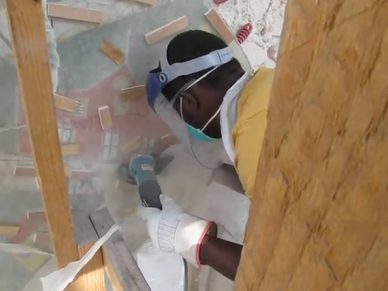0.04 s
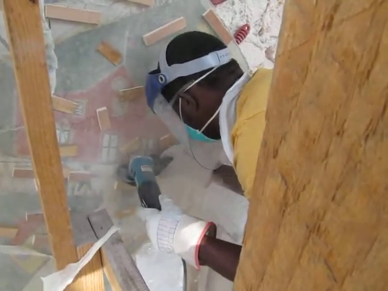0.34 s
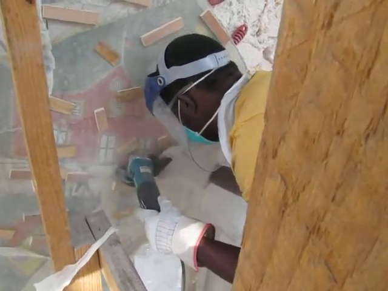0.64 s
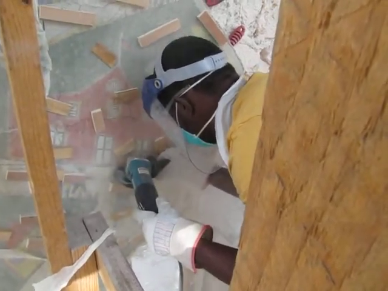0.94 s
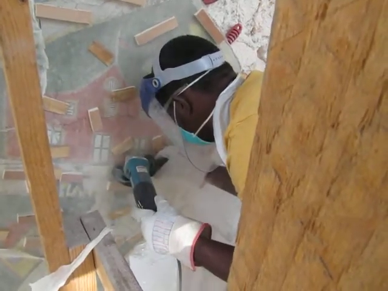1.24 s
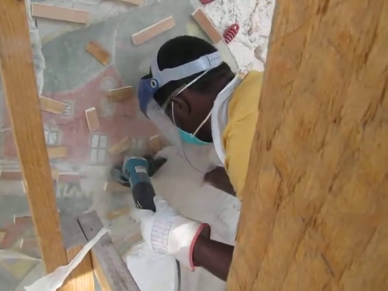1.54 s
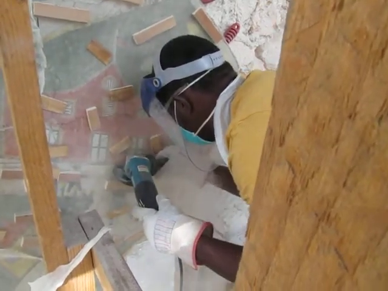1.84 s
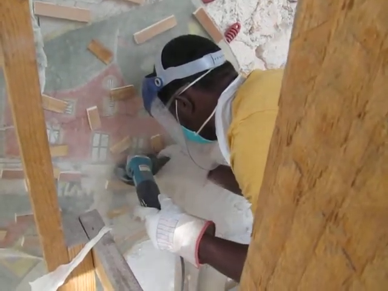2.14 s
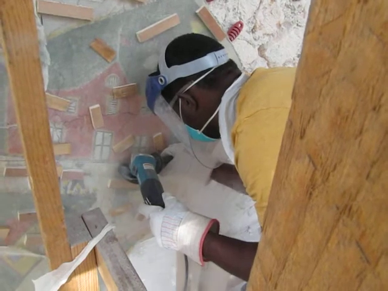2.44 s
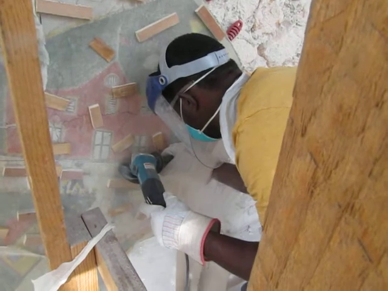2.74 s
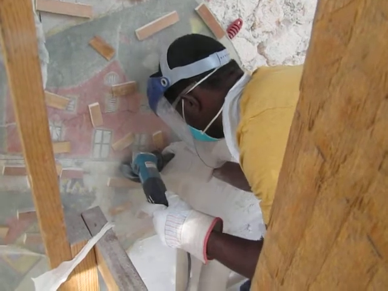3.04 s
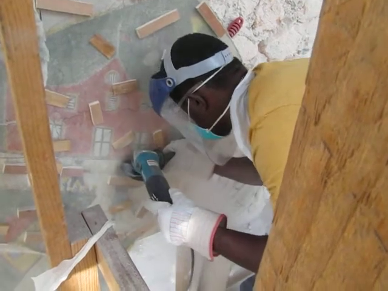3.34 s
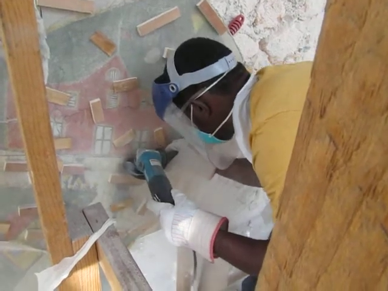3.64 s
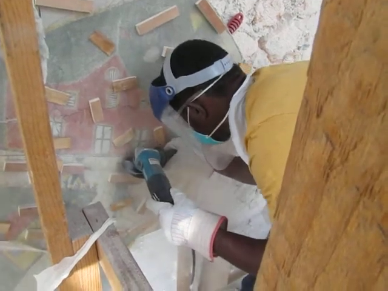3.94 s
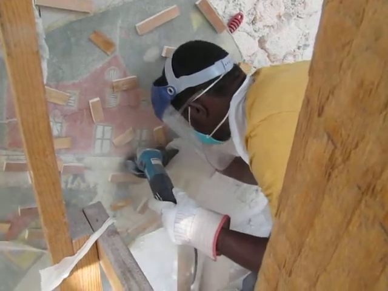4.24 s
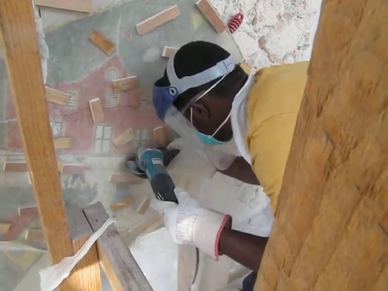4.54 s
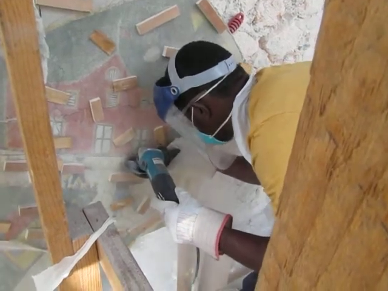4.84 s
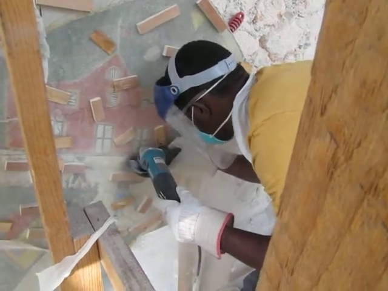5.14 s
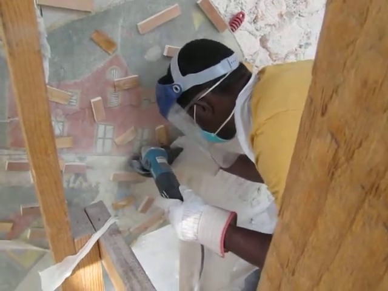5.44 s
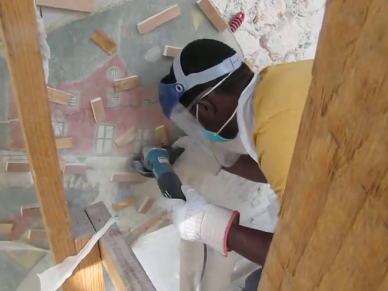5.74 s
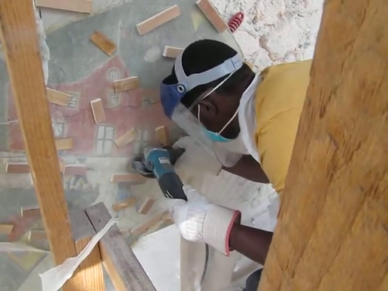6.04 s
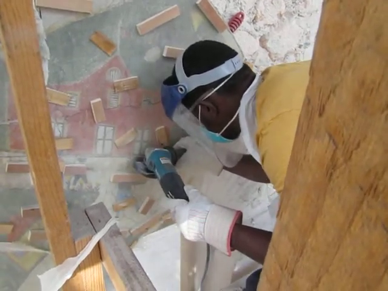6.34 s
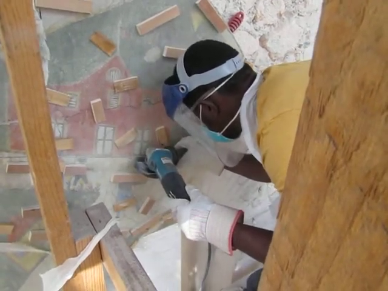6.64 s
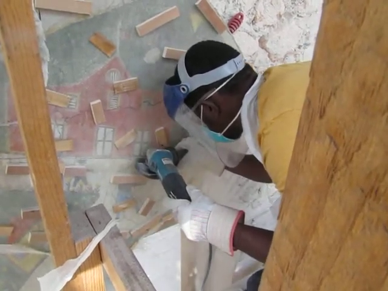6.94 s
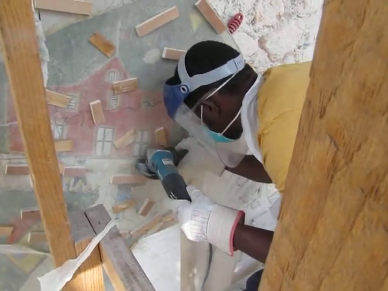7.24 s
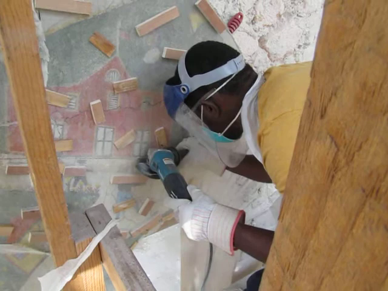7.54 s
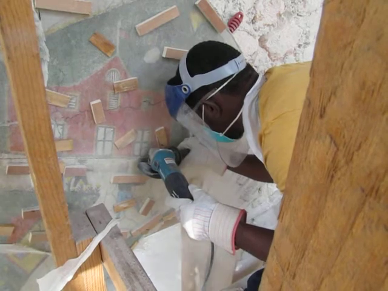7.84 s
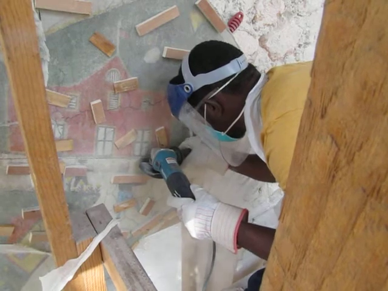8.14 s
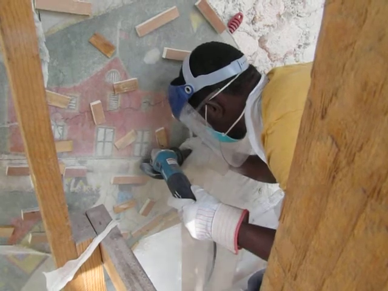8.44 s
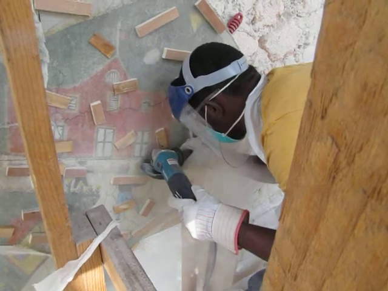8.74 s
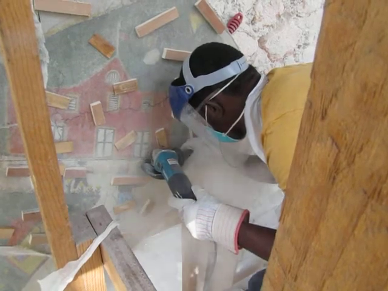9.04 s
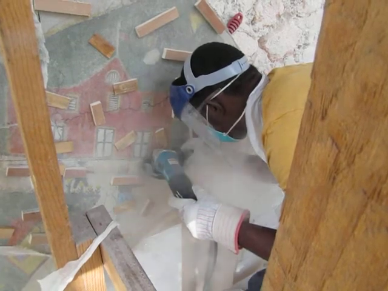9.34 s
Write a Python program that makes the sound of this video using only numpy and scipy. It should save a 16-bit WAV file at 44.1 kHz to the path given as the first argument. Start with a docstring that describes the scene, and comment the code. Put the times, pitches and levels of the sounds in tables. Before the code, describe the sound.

A handheld grinder whines and rasps without pause as its ringing disc bites into stone, chattering and faintly squealing.

```python
"""A harsh scrape, a steely ring and a high whine: an angle grinder cuts a groove in a plastered brick
or stone wall, about a metre away. Grit scrapes the rim and rings the steel disc, while the gear teeth
whine and rattle in their housing. The motor slows as the hand presses, and the disc chatters and now
and then squeals as it sinks in. A low rumble and air from the vents lie underneath, two dull bumps
pass, and the bare room adds a short echo."""
import sys
import numpy as np
from scipy import signal
from scipy.fft import rfft, irfft, next_fast_len
from scipy.io import wavfile
from scipy.ndimage import uniform_filter1d, minimum_filter1d, map_coordinates

SR = 44100
rng = np.random.default_rng(int(sys.argv[2]) if len(sys.argv) > 2 else 0)


def master(y):
    """Save y as 16-bit WAV."""
    cut = np.clip(np.atleast_2d(y).T, -1, 1)
    pcm = np.round(cut * 32767)  # scale
    wavfile.write(sys.argv[1], SR, pcm.astype(np.int16))


N = 414099
TIME = np.arange(N) / SR
FFT_SIZE = next_fast_len(N + SR, True)
FREQS_HZ = np.fft.rfftfreq(FFT_SIZE, 1 / SR) + 1e-3

# The motor's turns a second, which sag as the hand presses: time_s, speed_hz
MOTOR_SPEED = [(0, 455.4), (.3, 450.5), (.72, 450.8), (1.08, 444.7), (1.48, 431.2), (1.86, 435.5),
               (2.25, 435.6), (2.65, 453.2), (3.5, 453), (4.34, 444.6), (4.8, 442.4), (5.38, 430),
               (6.06, 442.6), (6.39, 435.9), (7.03, 449.3), (7.88, 436), (8.33, 444.4), (9.0, 423.9),
               (9.39, 436.8)]
# How far the disc has sunk in, from skimming (0) to deep (1): time_s, depth_share
CUT_DEPTH = [(0, 0), (1.8, 0), (2.25, 0.24), (3.2, .35), (4.1, 0.56), (5.8, 0.67), (6.35, 0.95), (9.39, 1)]
# The tone colour of grit breaking out of the wall: pitch_hz, relative_db
SCRAPE_COLOUR = [(300, -24), (760, -14.5), (950, -7.5), (2300, -3.5), (3000, 1.5), (3900, 2), (5600, -0.5),
                 (7400, -4), (8500, -13.5), (9800, -8), (10700, -17.5), (12300, -11.5), (14300, -7.5),
                 (15000, -33)]
# The notes at which the disc and its guard ring: pitch_hz, width_hz, skimming_db, half_sunk_db, deep_db
DISC_NOTES = [(891, 44, -18, -17, -13), (1198, 365, -20, -27, -16), (1729, 79, -18, -18, -10),
              (1904, 131, -16, -15, -13), (2796, 80, -15, -8, -7), (4966, 108, -2, -5, -1),
              (5439, 145, -3, -9, -3), (6111, 116, 1, -4, -3), (6856, 79, -3, -8, -3),
              (7800, 136, -2, -6, -8), (8768, 102, -4, -16, -14), (9540, 212, -15, -16, -16),
              (9971, 121, -6, -11, -7), (11162, 98, -8, -15, -11), (11770, 168, -15, -14, -11),
              (12491, 132, -11, -19, -11), (13953, 106, -21, -13, -10), (14172, 250, -12, -11, -10),
              (15371, 352, -25, -20, -20)]
# The gear tone and the side tones from the uneven big wheel: offset_in_disc_speeds, relative_db
GEAR_TONES = [(-3, -15), (-2, -6), (-1, -5), (-.5, -9), (0, 0), (.5, -12), (1, -4), (2, -11)]
# Base levels of the scrape, the ring and the gear, each: skimming_db, half_sunk_db, deep_db
SCRAPE_DB = [-24.5, -25.5, -24]
RING_DB = [-23, -28.5, -23]
GEAR_DB = [-26, -21, -21.3]
# The whine of the motor's spinning core at full load: times_motor_speed, level_db
ROTOR_WHINE = [(1, -55), (2, -51)]
# The hum of the disc at full depth: times_disc_speed, level_db
DISC_HUM = [(7, -57), (9, -50.5), (14, -48.5), (16, -50.5), (23, -62)]
# The drive's thin whistle, before load and depth change it: times_disc_speed, level_db
WHISTLE = [(114, -38.5)]
# The tone colour of the room's rumble: pitch_hz, relative_db
RUMBLE_COLOUR = [(20, -24), (33, -5), (44, 2), (60, -3), (75, -6), (150, -14), (300, -22), (800, -44)]
# The tone colour of air from the motor's vents: pitch_hz, relative_db
VENT_COLOUR = [(60, -36), (150, -2.5), (300, -2), (450, -3), (800, -5.5), (2000, -30)]
# How loud those two low sounds are: time_s, rumble_db, vent_db
LOW_LEVELS = [(0, -46, -48.5), (.9, -53, -47.5), (1.6, -48, -47), (2.3, -48.5, -46), (3.1, -49.5, -49.5),
              (3.9, -49, -49.5), (4.8, -53.5, -48), (6.4, -52.5, -47.5), (6.7, -49.5, -51.5),
              (9.39, -54, -51)]
# The part of the echo that differs between left and right: pitch_hz, gain_db
SIDE_ECHO = [(40, -20), (250, -15.5), (700, -13.5), (2300, -21), (3000, -12.5), (4300, -16.5), (5500, -9.5),
             (8000, -14), (10000, -3), (14000, -7)]
# How much louder the left side is than the right: pitch_hz, difference_db
LEFT_LOUDER = [(100, 0.5), (600, 1.4), (1300, 0), (2400, -0.2), (2850, -2.5), (3400, -1), (4200, 10),
               (5000, -5.5), (5500, 9), (6800, 0), (7900, 8), (9500, -2), (11200, 0.5), (12500, 3),
               (15000, 0.5)]
# How far the left wave runs ahead of the right: pitch_hz, lead_radians
LEFT_AHEAD = [(2500, 0), (3200, 1.42), (4300, 0.49), (5300, 1.08), (6500, 0.98), (8500, 1.3), (10500, 0),
              (14500, 1.83)]
# The disc's face rubs the side of the groove: middle_s, length_s, ring_change_db, scrape_change_db
RUBS = [(.66, .15, 5, -1), (1.58, 0.62, 2, 0.5), (2.6, .14, 1, -1), (2.9, .4, 0, 0.2), (3.8, 0.29, 3, .3),
        (4.2, 0.64, 2, 1.5), (5.0, .16, 1, -0.5), (6.46, 0.13, 2, 1), (7.6, .3, 1.2, 0.5),
        (8.07, 0.17, 2, 0), (8.35, .18, -0.5, 3), (8.75, 0.14, 6.5, 1.5), (9.22, 0.65, 2, -0.5)]
# The disc skips hard in the groove: middle_s, length_s, added_bounce
SKIPS = [(.9, 0.51, 0.07), (2.25, 0.52, 0.1), (3.7, 0.54, 0.25), (5.15, 0.89, 0.39), (6.25, .7, 0.25)]
# The hand eases off: middle_s, length_s, gear_change_db, scrape_and_ring_change_db
EASES = [(.95, 0.36, 2.5, -0.8), (1.25, .1, -2, 0.5), (2.25, 0.51, -0.5, -2.5), (2.81, 0.068, -4.5, -1),
         (3.6, 0.12, 0.5, -1), (4.03, 0.18, -2.5, -0.5), (5.17, 0.12, -2.5, -1.3), (5.39, 0.055, -3, -2.3),
         (5.8, 0.58, -1.2, -1), (6.65, 0.33, -3, -0.5), (7.25, .07, -2.5, -1), (8.0, .2, -1.5, -0.5),
         (8.55, .18, -2.5, -0.5)]
# The rim catches and the gear takes the strain: middle_s, length_s, gear_boost_db
CATCHES = [(1.11, 0.18, 4), (1.76, .07, 3), (1.9, 0.076, 5.5), (2.1, 0.12, 2), (3.14, 0.099, 3.5),
           (3.42, 0.33, 2.5), (3.73, .12, 1.5), (4.2, 0.19, 4), (4.97, .16, 1.5), (5.29, 0.18, 2.5),
           (6.2, .14, 3.5), (7.07, 0.22, 2), (7.57, 0.26, 1.5), (8.33, .2, 3), (8.76, 0.15, 6),
           (8.98, 0.14, 4.5), (9.31, .12, 2.5)]
# The disc binds and one note squeals: middle_s, length_s, pitch_hz, level_db
SQUEALS = [(1.65, 1, 1875, -46), (2.6, 0.46, 1684, -45), (4.12, 0.6, 2800, -36), (4.547, 0.91, 1903, -40),
           (5.27, 0.46, 1700, -42.5)]
# Dull bumps: start_s, pitch_hz, level_db, fade_s (the time to fall by 60 dB)
BUMPS = [(3.276, 135, -42, 0.17), (3.444, 118, -32.5, 0.27)]

SMALL_WHEEL_TEETH, BIG_WHEEL_TEETH = 10, 37  # the motor turns the small wheel, the big one the disc
FREE_HZ, SAG_HZ = 456, 30  # motor speed with no load, and its drop at full load
# What full load adds to each level
GEAR_LOAD_DB, TONE_LOAD_DB, SCRAPE_LOAD_DB, RING_LOAD_DB = 0.5, 1, 0.75, -0.2
ROTOR_LOAD_DB, WHISTLE_LOAD_DB = 3.5, 4


def undb(db):
    """Turn decibels into a number to multiply by."""
    return 10 ** (np.asarray(db) / 20)


def unit(x):
    """Scale a signal to an average power of one."""
    return x / np.sqrt(np.mean(np.abs(x) ** 2))


def curves(table):
    """Join a table's points over time: one curve for each column after the first."""
    times_s, *columns = np.transpose(table)
    return [np.interp(TIME, times_s, column) for column in columns]


def across_pitch(points):
    """Join (pitch_hz, value) points, giving every octave the same space."""
    hz, value = np.transpose(points)
    return np.interp(np.log(FREQS_HZ), np.log(hz), value)


def filtered(x, response):
    """Multiply each frequency in a sound by its own gain."""
    return irfft(rfft(x, FFT_SIZE) * response, FFT_SIZE)[..., :N]


def coloured(x, colour):
    """Give a sound a tone colour from a table, at a power of one."""
    return unit(filtered(x, undb(across_pitch(colour))))


def resonate(x, hz, width_hz):
    """Keep a narrow band round one pitch; filtering twice makes its edges steep."""
    stage = np.concatenate(signal.iirpeak(min(hz, .45 * SR), hz / width_hz, fs=SR))
    return signal.sosfilt([stage, stage], x)


def wander(rate_hz):
    """A random curve that strays about one from zero and turns rate_hz times a second."""
    points = rng.standard_normal(4096)
    return 1.2 * np.interp(TIME * rate_hz, np.arange(len(points)), points)


def arch(middle_s, length_s):
    """A rounded rise from zero to one and back."""
    return np.maximum(1 - (2 * (TIME - middle_s) / length_s) ** 2, 0)


def swells(events):
    """Add up one arch per (middle_s, length_s, heights...) row: one curve for each height column."""
    return sum(np.outer(heights, arch(middle_s, length_s)) for middle_s, length_s, *heights in events)


def at_depth(depth, values):
    """Blend three values: for the rim skimming, half sunk and deep in the groove."""
    return np.interp(depth, np.linspace(0, 1, len(values)), values)


def chatter(disc_turns, usual_bounce=0.08, drift_hz=1.816):
    """Pressure on the rim: the disc bounces every second turn, runs off centre and is slightly warped."""
    angle = 2 * np.pi * disc_turns
    bounce = (usual_bounce + swells(SKIPS)[0]) * np.cos(angle / 2)
    once, twice = (size * np.abs(wander(drift_hz)) for size in (.15, .14))
    off_centre = once * np.cos(angle + 1.07 * wander(3.35))
    warp = twice * np.cos(2 * angle + 0.67 * wander(3.26))
    return bounce + off_centre + warp


def grit(disc_turns, pressure, grain_db=2.5, rim_share=0.13, rim_points=370):
    """Countless uneven grains hit the rim, whose own roughness comes round again on every turn."""
    grains = unit(rng.standard_normal(N) * undb(grain_db * rng.exponential(size=N)))
    roughness = rng.standard_normal(rim_points)
    rim = unit(map_coordinates(roughness, [disc_turns % 1 * rim_points], order=3, mode="grid-wrap"))
    crumble = undb(wander(260) + 0.68 * wander(35))
    hits = np.sqrt(1 - rim_share) * grains + np.sqrt(rim_share) * rim
    return unit(hits * np.exp(0.65 * pressure) * crumble)


def disc_ring(force, depth):
    """Grit rings the steel; the groove muffles some notes and feeds others as the contact point moves."""
    ring = 0
    for hz, width_hz, *db_by_depth in DISC_NOTES:
        ring = ring + resonate(force, hz, width_hz) * undb(at_depth(depth, db_by_depth) + wander(9))
    # The notes share one steady total power.
    return ring / np.sqrt(uniform_filter1d(ring ** 2, SR // 2))


def gear_whine(motor_turns, disc_turns, pressure, tone_db, rattle_hz=300, housing_hz=(4140, 4540)):
    """Meeting teeth whine and the slack between them rattles; the housing lets one band of both out."""
    slack = rng.standard_normal((2, N))
    rattle_filter = signal.butter(2, rattle_hz, fs=SR, output="sos")
    rattle = unit(signal.sosfilt(rattle_filter, slack[0] + 1j * slack[1]))
    # Each gear tone fades in and out and drifts in phase by itself.
    sizes = np.array([undb(db + 4 * wander(5)) for _, db in GEAR_TONES])
    angles = np.array([2 * np.pi * (offset * disc_turns + rng.random()) + 1.1 * wander(5)
                       for offset, _ in GEAR_TONES])
    cluster = np.sum(sizes * np.exp(1j * angles), axis=0) / np.linalg.norm(sizes, axis=0)
    tone_gain = undb(tone_db)
    teeth = (tone_gain * cluster + rattle) / np.sqrt(1 + tone_gain ** 2) * np.exp(0.86 * pressure)
    # Move tones and rattle up to the rate at which the teeth meet.
    whine = np.real(teeth * np.exp(2j * np.pi * SMALL_WHEEL_TEETH * motor_turns))
    housing = signal.butter(2, housing_hz, "bandpass", fs=SR, output="sos")
    return unit(signal.sosfilt(housing, whine))


def tones(turns, table):
    """Tones at whole multiples of a turning speed, each wavering gently in level."""
    return sum(np.sqrt(2) * undb(db + 1.5 * wander(5)) * np.sin(2 * np.pi * multiple * turns)
               for multiple, db in table)


def spinning_parts(motor_turns, disc_turns, load, depth, bite_depth=.6):
    """The rotor sings louder with load, the disc hums louder with depth, the whistle grows with both."""
    rotor = tones(motor_turns, ROTOR_WHINE) * undb(ROTOR_LOAD_DB * (load - 1))
    hum = tones(disc_turns, DISC_HUM) * undb(6.4 * (depth - 1))
    shallow_db = 10 * np.minimum(depth - bite_depth, 0)  # quieter until the disc has bitten in
    whistle = tones(disc_turns, WHISTLE) * undb(WHISTLE_LOAD_DB * load + shallow_db)
    return rotor + hum + whistle


def judder(rate_hz=11, rate_spread=.25):
    """The tool shakes in the hand, never quite evenly."""
    shakes = np.cumsum(rate_hz * (1 + rate_spread * wander(rate_hz))) / SR
    return unit(np.sin(2 * np.pi * shakes) * undb(2.2 * wander(2.93)))


def cutting_levels(depth, load):
    """Depth and load set the levels; shaking, rubbing, easing off and catching move them."""
    rub_ring_db, rub_scrape_db = swells(RUBS)
    ease_gear_db, ease_disc_db = swells(EASES)
    catch_db, = swells(CATCHES)
    shake = judder() * at_depth(depth, [.6, 1, 1])  # gentler while the rim only skims
    gear_db = at_depth(depth, GEAR_DB) + GEAR_LOAD_DB * load + 1.1 * shake + ease_gear_db + catch_db
    tone_db = -1.8 + TONE_LOAD_DB * load + 0.9 * catch_db  # the gear's tone compared with its rattle
    scrape_db = at_depth(depth, SCRAPE_DB) + SCRAPE_LOAD_DB * load + .35 * shake
    scrape_db += ease_disc_db + rub_scrape_db
    ring_db = at_depth(depth, RING_DB) + RING_LOAD_DB * load + .85 * shake
    ring_db += ease_disc_db + rub_ring_db
    return gear_db, tone_db, scrape_db, ring_db


def background(mains_hz=60):
    """The room rumbles, air rushes from the vents and the mains hums at twice its own rate."""
    rumble_db, vent_db = curves(LOW_LEVELS)
    rumble = coloured(rng.standard_normal(N), RUMBLE_COLOUR) * undb(rumble_db + 1.4 * wander(7))
    vent_air = coloured(rng.standard_normal(N), VENT_COLOUR) * undb(vent_db)
    return rumble + vent_air + tones(mains_hz * TIME, [(2, -59.5)])


def wall_echoes(x, fade_s=0.21, patterns=3, drift_hz=.6):
    """Sound bounces off the walls; as tool and worker move, one echo pattern gives way to another."""
    age = TIME[:SR // 2]
    tails = rng.standard_normal((patterns, len(age))) * undb(-60 * age / fade_s) * (age > .003)
    tails = tails / np.linalg.norm(tails, axis=1, keepdims=True)
    shares = np.array([wander(drift_hz) for _ in range(patterns)])
    echoes = filtered(x, rfft(tails, FFT_SIZE))
    return np.sum(echoes * shares / np.linalg.norm(shares, axis=0), axis=0)


def room(x, echo_db=-10):
    """Close bare walls echo; left and right are alike in the bass and differ in the treble."""
    left_right = np.array([[1], [-1]])
    middle = x + undb(echo_db) * wall_echoes(x)
    side = filtered(wall_echoes(x), undb(across_pitch(SIDE_ECHO)))
    balance = undb(left_right * across_pitch(LEFT_LOUDER) / 2)
    lead = np.exp(.5j * left_right * across_pitch(LEFT_AHEAD))
    return filtered(middle + left_right * side, balance * lead)


def squeals(force, width_hz=75):
    """Where the disc binds, friction feeds a single note, which swells and dies away."""
    return sum(unit(resonate(force, hz, width_hz)) * np.sqrt(arch(middle_s, length_s)) * undb(db)
               for middle_s, length_s, hz, db in SQUEALS)


def bumps():
    """Two dull bumps, each a low tone that fades quickly."""
    out = 0
    for start_s, hz, db, fade_s in BUMPS:
        age = np.maximum(TIME - start_s, 0)
        out = out + undb(db - 60 * age / fade_s) * np.sin(2 * np.pi * hz * age)
    return out


def scene():
    """The motor drives the gear and the disc; load and depth move scrape, ring and whine together."""
    speed_hz, = curves(MOTOR_SPEED)
    depth, = curves(CUT_DEPTH)
    load = (FREE_HZ - speed_hz) / SAG_HZ  # 0 running free, 1 at full load
    gear_db, tone_db, scrape_db, ring_db = cutting_levels(depth, load)
    motor_turns = np.cumsum(speed_hz * (1 + 0.0003214 * wander(25))) / SR
    disc_turns = motor_turns * SMALL_WHEEL_TEETH / BIG_WHEEL_TEETH
    pressure = chatter(disc_turns)
    force = grit(disc_turns, pressure)
    scrape = coloured(force, SCRAPE_COLOUR) * undb(scrape_db)
    ring = disc_ring(grit(disc_turns, pressure), depth) * undb(ring_db)
    whine = gear_whine(motor_turns, disc_turns, pressure, tone_db) * undb(gear_db)
    spin = spinning_parts(motor_turns, disc_turns, load, depth)
    return room(scrape + ring + whine + spin + background() + squeals(force) + bumps())


def record(dry, ceiling=0.79, top_hz=15600):
    """Turn down the highest peaks and cut off the very top of the treble."""
    hold = SR // 100  # 10 ms
    allowed = ceiling / np.maximum(np.abs(dry).max(axis=0), ceiling)
    gain = uniform_filter1d(minimum_filter1d(allowed, hold), hold)
    return signal.sosfilt(signal.ellip(10, .1, 80, top_hz, fs=SR, output="sos"), dry * gain)


dry = scene()
out = record(dry)
master(out)
```